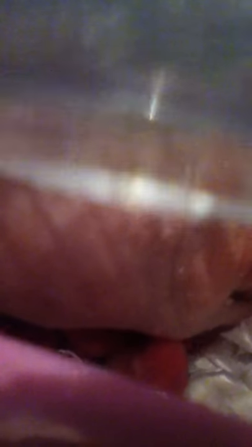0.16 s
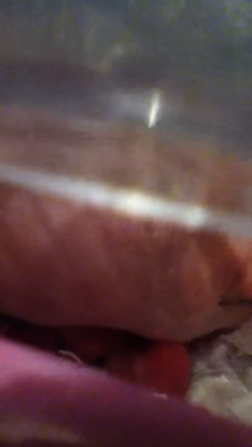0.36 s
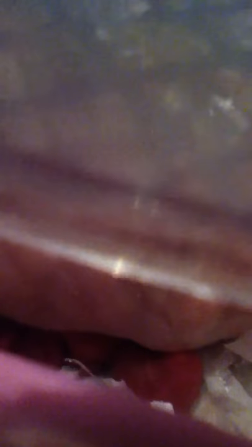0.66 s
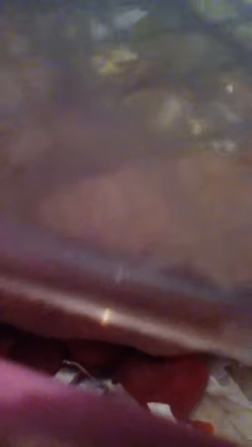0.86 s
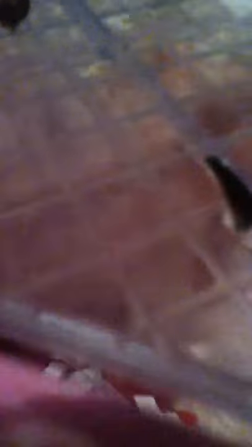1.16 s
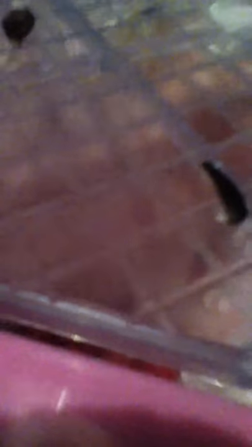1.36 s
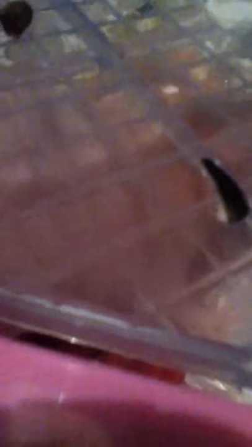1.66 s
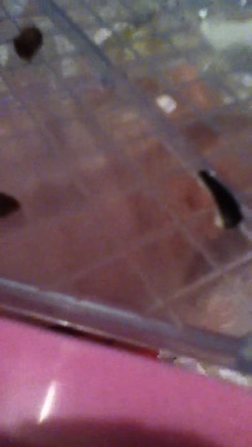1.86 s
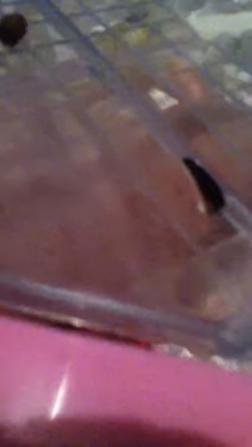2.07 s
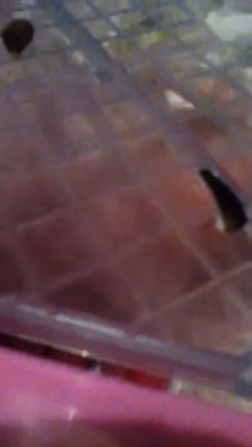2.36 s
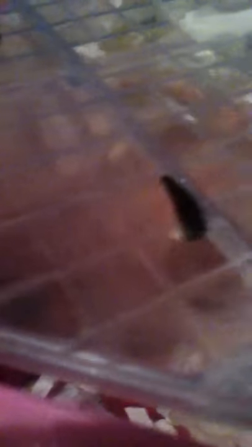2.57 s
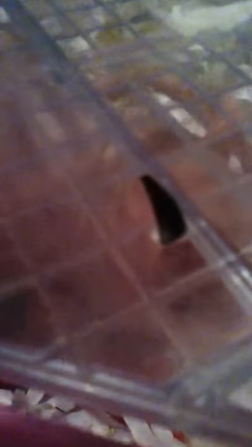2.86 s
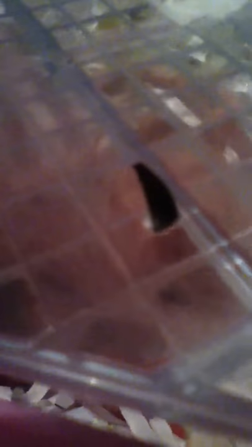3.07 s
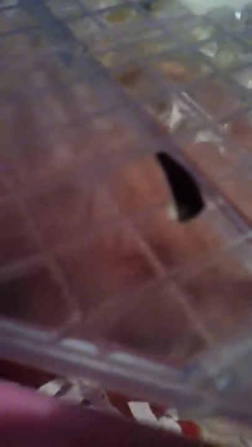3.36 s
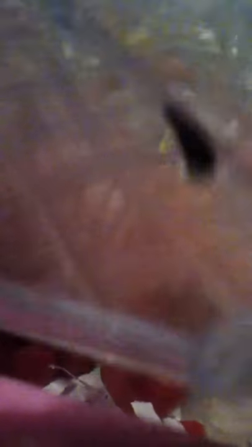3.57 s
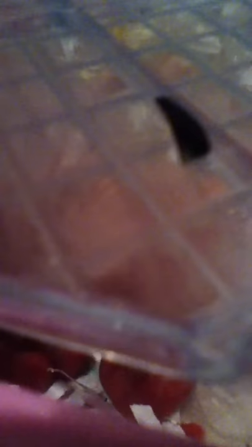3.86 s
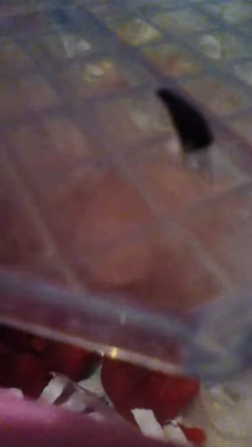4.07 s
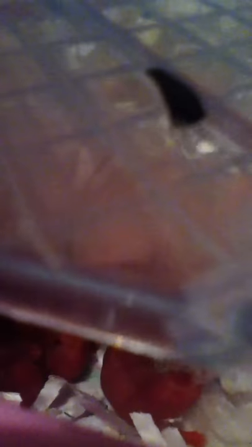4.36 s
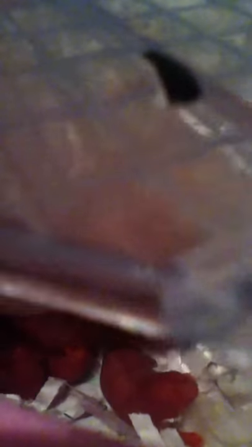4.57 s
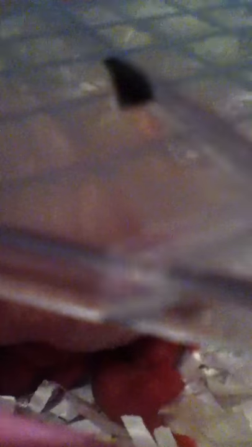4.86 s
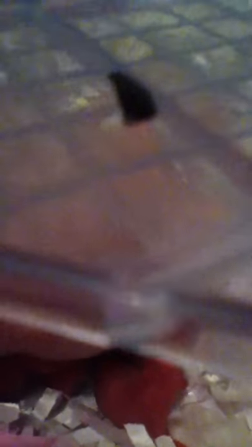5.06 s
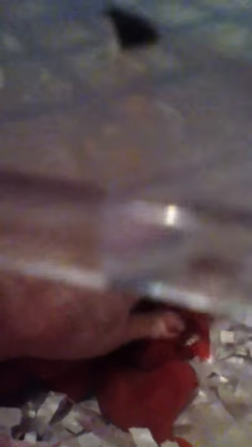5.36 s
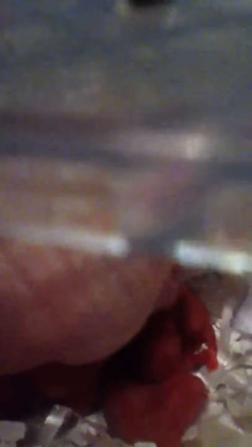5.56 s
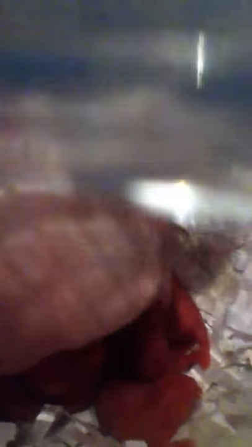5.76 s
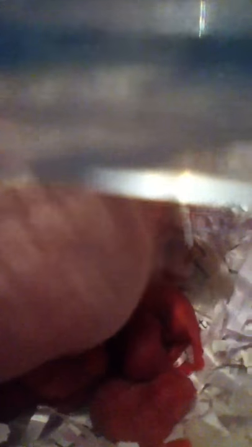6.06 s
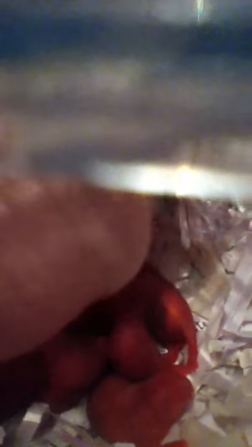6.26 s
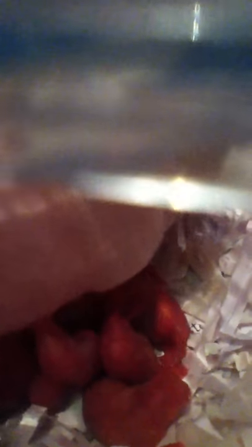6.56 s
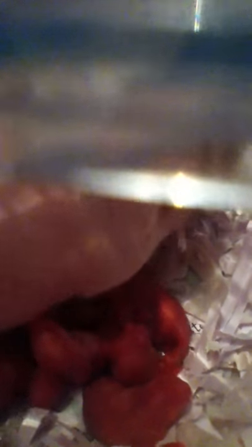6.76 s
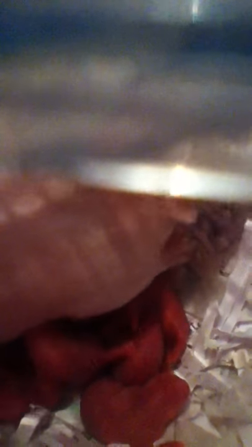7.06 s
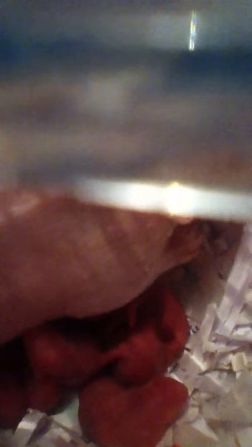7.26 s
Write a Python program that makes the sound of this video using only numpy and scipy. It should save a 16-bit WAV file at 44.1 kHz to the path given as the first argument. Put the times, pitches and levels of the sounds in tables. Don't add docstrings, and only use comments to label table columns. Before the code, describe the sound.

Close paper snaps and soft bumps, a loud early plastic knock, then sparse rustling with brief hoarse pup squeaks, the loudest near the end.

```python
import sys
import numpy as np
from scipy import signal
from scipy.io import wavfile

SR = 44100
rng = np.random.default_rng(int(sys.argv[2]) if len(sys.argv) > 2 else 0)


def waveform_to_disk(signal):
    frames = np.transpose(np.atleast_2d(signal))
    scaled = np.clip(frames, -1, 1) * 32767
    samples = np.round(scaled).astype(np.int16)
    wavfile.write(sys.argv[1], SR, samples)


def linear_from_db(decibels):
    return 10 ** (np.asarray(decibels, float) / 20)


N = 327222

# (time [s], rumble level [dB], far whoosh level [dB])
ROOM_LEVELS = [
    (0.0, -62.5, -78),
    (0.72, -59.5, -62),
    (1.07, -53, -64),
    (1.49, -59.5, -59),
    (3.37, -60, -58),
    (5.72, -57, -59.5),
    (6.49, -58, -57.5),
    (6.72, -62.5, -61),
    (7.42, -61.5, -67),
]
# (frequency [Hz], density [dB per Hz])
RUMBLE_SPECTRUM = [(15, -44), (25, -15.5), (146, 1), (176, 0), (213, 2.5), (444, -8.5), (605, -11),
                   (1220, -16), (1500, -32), (1950, -45), (3300, -120)]
# (frequency [Hz], density [dB per Hz])
WHOOSH_SPECTRUM = [(500, 0), (900, 1.5), (1400, 14.5), (1800, -29), (2600, -31), (4000, -20)]
# (frequency [Hz], density [dB per Hz])
HISS_SPECTRUM = [(180, -13), (300, -14.5), (546, -12.5), (1210, -14.5), (2030, -11.5), (13800, -18.5),
                 (14500, -21), (16000, -28)]
# (frequency [Hz], level [dB])
WHINE_TONE = [(14993, -80)]
# (middle time [s], spread [s], level [dB], brightness [dB])
RUSTLE_SWELLS = [(0.019, 0.029, -62, 9.5), (.11, 0.072, -71, 12), (.26, 0.15, -64, -10),
                 (.65, 0.025, -63, -9), (.91, 0.089, -54.5, -8), (1.04, 0.035, -51, -12),
                 (1.25, 0.14, -64, -20), (1.4, 0.034, -66, -15), (1.475, 0.024, -54, -9),
                 (1.93, 0.022, -57.5, -26), (3.105, 0.032, -57.5, -25), (3.36, 0.072, -62.5, -17),
                 (3.76, 0.1, -61, -16), (3.74, 0.018, -64, -25), (4.3, 0.12, -66, -15),
                 (4.56, 0.032, -58, -10), (4.69, 0.045, -61.5, -6), (5.09, 0.031, -58, -20),
                 (5.6, 0.15, -71.5, -10), (5.8, 0.14, -62.5, -5), (5.93, 0.028, -65, -15),
                 (6.15, 0.12, -74, -4), (6.42, 0.075, -64, -1), (6.64, 0.038, -55.5, -22),
                 (7.15, 0.062, -62.5, -7)]
# (time [s], peak level [dB], pitch [Hz])
STIFF_SNAPS = [(.0454, -53, 6640), (.0722, -50, 6050), (.1037, -48, 6800), (.1481, -40.5, 2270),
               (.1614, -44.5, 1800), (.3795, -47, 2310), (.4923, -47, 4540), (3.212, -45, 2000),
               (4.3345, -49, 4060), (4.18, -49, 3500), (4.314, -51, 3500), (5.07, -51, 4000),
               (.1912, -43.5, 2200), (6.437, -48, 2000), (4.6997, -44, 2200), (4.796, -39, 5400),
               (5.4295, -41, 5200), (5.5897, -45, 2900), (5.7753, -49, 1940), (5.8222, -47, 4180),
               (5.932, -46, 5500), (6.1973, -46, 6700), (6.3285, -45, 1850), (6.3874, -37.5, 1600),
               (6.4074, -57, 1800), (6.4253, -35.5, 2880), (6.4457, -42, 2340), (6.4534, -44, 3560),
               (6.5724, -38.5, 4760)]
# (time [s], peak level [dB], pitch [Hz])
LIMP_SNAPS = [(.0104, -35.5, 5200), (.5232, -40, 4100), (.6519, -45, 4030), (.7123, -46.5, 3200),
              (.9373, -38.5, 1800), (.9577, -32, 3600), (1.066, -41, 5600), (1.1837, -37, 3240),
              (1.2574, -47, 4680), (3.1492, -46, 2900), (3.5344, -48.5, 2900), (3.7189, -45, 4770),
              (3.7574, -43, 4500), (3.775, -46, 4770), (3.8447, -49, 5130), (3.886, -47, 4700),
              (4.0776, -44.5, 5070), (4.138, -46.5, 2260), (4.5381, -51, 2910), (4.9377, -44.5, 4950),
              (4.9691, -44.5, 3460), (5.896, -43.5, 3620), (5.9209, -40, 4240), (5.987, -50, 3200),
              (6.1185, -46, 3700), (6.8174, -43, 3550), (6.8249, -39.5, 2380), (6.8508, -47, 5800),
              (7.1272, -43.5, 1800), (7.3886, -44, 2680)]
# (time [s], peak level [dB], pitch [Hz])
CLAW_TICKS = [
    (5.4191, -42, 2040),
    (6.9496, -52.5, 2130),
]
# (time [s], peak level [dB], pitch [Hz])
LIP_SMACKS = [
    (2.1105, -57, 5200),
    (2.1754, -57, 4800),
    (2.1954, -55, 5000),
    (2.2104, -47.5, 5000),
    (2.4823, -50, 5800),
]
# (time [s], peak level [dB], pitch [Hz], edge above 500 Hz [dB], T60 [s])
SOFT_BUMPS = [(0.191, -36, 450, -4.5, 0.11), (0.197, -37, 167.4, -8, 0.2), (0.607, -47.5, 165.4, -20, 0.26),
              (.889, -42, 216, -21, 0.19), (.934, -43, 170, -4, 0.25), (1.005, -39.5, 141, -8, 0.2),
              (1.364, -46.5, 194, -6.5, 0.26), (1.469, -52.5, 224, 1, .12), (1.892, -49.5, 396, 0, .1),
              (1.911, -42.5, 198, -12, 0.22), (1.9427, -39.5, 485, -7, 0.056), (1.705, -49, 230, -9, 0.11),
              (1.97, -48, 450, -8, .1), (2.216, -38.5, 203.7, -10, 0.24), (2.228, -30.5, 204.7, -19, 0.17),
              (2.245, -33, 183.4, -19, 0.19), (2.265, -39.5, 166, -17, 0.1),
              (2.4835, -45.5, 580, -7, 0.026), (4.235, -53, 1200, -3, .14), (5.197, -39.5, 390, -3, 0.025),
              (5.442, -37, 208, -7.5, 0.11), (5.467, -52, 300, 2, 0.047), (5.897, -41, 387, -1.5, 0.033),
              (0.1914, -43, 1250, -5, 0.13)]
# (time [s], pitch [Hz], level [dB])
SQUEAK_CONTOURS = [
    [(.732, 1810, -58), (.74, 1750, -53), (.75, 1620, -61), (.756, 1510, -51), (.773, 1520, -52),
     (.779, 1550, -60), (.8, 1650, -58)],
    [(.72, 2500, -64), (.728, 2480, -61), (.748, 2400, -59)],
    [(1.955, 4450, -78), (1.963, 4480, -70)],
    [(1.978, 4480, -75), (2.0, 4400, -84)],
    [(2.112, 4430, -63), (2.13, 4490, -60), (2.15, 4430, -60), (2.175, 4270, -60.5)],
    [(2.285, 1010, -72), (2.315, 1566, -63), (2.35, 1950, -63), (2.366, 2070, -78), (2.382, 2205, -65),
     (2.4, 2820, -58), (2.411, 3130, -59), (2.436, 3540, -58.5), (2.448, 3600, -68)],
    [(2.403, 1610, -70), (2.413, 1605, -58.5), (2.422, 1570, -73)],
    [(3.17, 1416, -56), (3.18, 1480, -63)],
    [(3.168, 2790, -62), (3.178, 2920, -53), (3.188, 3150, -54), (3.196, 3100, -54), (3.208, 2820, -56),
     (3.227, 2600, -69)],
    [(6.512, 2505, -53), (6.518, 2480, -48), (6.53, 2480, -44), (6.54, 2640, -43), (6.547, 2756, -45),
     (6.554, 2716, -42), (6.56, 2760, -42), (6.566, 2720, -42), (6.571, 2600, -58)],
]
# (overtones against tone [dB], roughness [0-1])
CALL_VOICING = [(-20, .45), (-16, 0.35), (-40, .15), (-40, .1), (-40, 0.04), (-0.5, .22), (3, 0.32),
                (1, 0.2), (-11, .13), (-12.5, 0.1)]
# (frequency [Hz], gain [dB])
THROAT_RESPONSE = [(1000, 2.5), (3000, 0), (3800, 4.5), (4700, 13.5), (5600, 0.5), (6800, -6), (8000, 2),
                   (12000, -10)]
# (start [s], length [s], level [dB], throat from
# [Hz], throat to [Hz])
BREATH_SWELLS = [
    (0.728, 0.066, -54.5, 3600, 3350),
    (2.213, 0.16, -53.5, 4410, 4600),
    (2.221, .07, -60, 5300, 5520),
    (2.271, .14, -53.5, 5030, 6030),
    (2.326, 0.095, -53, 4000, 4800),
    (4.226, 0.054, -60, 1854, 1870),
    (2.273, 0.09, -63, 11200, 11000),
]
# (start [s], length [s], level [dB], throat from [Hz], throat to [Hz])
BREATH_BURSTS = [
    (3.168, 0.012, -59, 4150, 4300),
    (6.498, .022, -50, 3200, 2800),
    (6.549, 0.021, -55.5, 5900, 5400),
    (6.5465, .006, -52, 3500, 3000),
]
# (time [s], level [dB])
SHOVE_LEVELS = [
    (.957, -42),
    (.965, -46),
    (.969, -35),
    (.976, -34.5),
    (.995, -43.5),
    (1.02, -56),
    (1.05, -56),
]
# (frequency [Hz], bandwidth [Hz], level [dB])
WAD_HOLLOWS = [(1800, 710, 5), (3330, 1200, 2), (5200, 350, -1.5), (8000, 730, -2)]
# (time [s], peak level [dB])
KNOCK_STEPS = [
    (1.0770, -20),
    (1.0793, -13.5),
    (1.0811, -11),
    (1.0830, -22),
    (1.0845, -4),
    (1.0952, -18),
    (1.1037, -11.5),
    (1.118, -16),
]
# (frequency [Hz], level [dB], T60 [s])
SHELL_MODES = [(117, -17.5, 0.32), (156.3, -2.5, 0.45), (198.4, 0.5, 0.25), (228.4, -3, 0.31),
               (261, -1.5, 0.12), (333, -6.5, 0.27), (393, -9, 0.19), (506, -1.5, 0.11), (531, -5.5, .09),
               (707, -13, 0.15), (893, 1, 0.13), (1400, -16, 0.1), (1232, -4, 0.11)]
# (frequency [Hz], density [dB per Hz])
RATTLE_SPECTRUM = [(290, -25), (500, -0.5), (795, -7), (893, -2), (1230, -5.5), (1340, -4), (2430, -13),
                   (8580, -28), (16000, -50)]
# (frequency [Hz], T60 [s])
RATTLE_T60 = [(400, 0.15), (2000, 0.14), (5000, 0.22), (14000, 0.074)]
# (frequency [Hz], density [dB per Hz])
CHATTER_SPECTRUM = [(700, -13), (1500, -9), (3500, 4), (6000, -14.5), (9000, -14), (14000, -38)]
# (start [s], length [s], level [dB], slap rate [per s], throat [Hz])
CALL_CREAKS = [
    (3.15, 0.036, -52, 560, 3320),
    (6.48, 0.0324, -43, 980, 3500),
]
# (start [s], end [s], frequency [Hz], bandwidth [Hz], level [dB])
FAR_DRONES = [
    (5.88, 6.68, 1450, 260, -63),
    (4.2, 4.35, 1180, 290, -67),
    (5.9, 6.68, 606, 86, -70.5),
]


def rms_one(x):
    return x / np.sqrt(np.mean(x ** 2) + 1e-20)


def columns(rows, first=0, size=N):
    s, *rest = np.transpose(rows)
    times = (first + np.arange(size)) / SR
    return [np.interp(times, s, c) for c in rest]


def span(rows):
    first, size = round(rows[0][0] * SR), round((rows[-1][0] - rows[0][0]) * SR)
    k = np.arange(size)
    return first, size, np.clip(np.minimum(k, size - k) / (0.00099 * SR), 0, 1)


def at_hz(points, hz):
    table = np.array(points)
    return np.interp(np.log(hz), np.log(table[:, 0]), table[:, 1])


def add(out, s, piece):
    at = round(s * SR)
    out[at:at + len(piece)] += piece[:N - at]


def drift(rate, size=N):
    knots = rng.standard_normal(size // 100 + 300)
    return np.interp(np.arange(size) * rate / SR, np.arange(len(knots)), knots)


def flicker(depth_db, rate):
    knots = linear_from_db(depth_db * rng.standard_normal(400))
    return np.interp(np.arange(N) * (rate / SR), np.arange(400), knots)


def band(x, low_hz, high_hz):
    edges = np.clip([low_hz, high_hz], 15, .45 * SR)
    return signal.sosfilt(signal.butter(2, edges, "band", fs=SR, output="sos"), x)


def ring(x, hz, t60):
    r, w = linear_from_db(-60 / (t60 * SR)), 2 * np.pi * hz / SR
    return signal.lfilter([0, np.sin(w)], [1, -2 * r * np.cos(w), r * r], x + 1e-18)


def coloured(spectrum, shape, size=N):
    edges = 20 * 2 ** np.arange(0, 10, .5)
    white = rng.standard_normal((2, size))
    out = np.zeros(size)
    for k, mid in enumerate(np.sqrt(edges[:-1] * edges[1:])):
        if spectrum[0][0] < mid < spectrum[-1][0]:
            noise = band(white[k % 2], edges[k], edges[k + 1])
            out += linear_from_db(at_hz(spectrum, mid)) * shape(mid) * noise
    return out


def background():
    rumble_db, whoosh_db = columns(ROOM_LEVELS)
    rumble = rms_one(flicker(1.3, 9.0) * coloured(RUMBLE_SPECTRUM, lambda hz: flicker(1.9, 14.0)))
    whoosh = rms_one(coloured(WHOOSH_SPECTRUM, lambda hz: flicker(2.5, 12.0)))
    hiss = rms_one(coloured(HISS_SPECTRUM, lambda hz: 1))
    hz, whine_db = WHINE_TONE[0]
    whine = np.sqrt(2) * np.sin(2 * np.pi * hz * np.arange(N) / SR + 1.46 * drift(30.0))
    room = linear_from_db(rumble_db + 0.5) * rumble + linear_from_db(whoosh_db - 8.0) * whoosh
    return room + linear_from_db(-63.5) * hiss + linear_from_db(whine_db) * whine


def rustle(per_s=3000.0, spread_db=3.0):
    stir_db = -75.5
    born = rng.random(N) < per_s / SR * flicker(3.5, 40.0)
    strength = linear_from_db(spread_db * np.minimum(rng.exponential(1, N), 4))
    cracks = born * strength * np.sign(rng.random(N) - .5)
    pitches, dealt = np.geomspace(1100, 11500, 11), rng.integers(0, 11, N)
    rings = [ring(cracks * (dealt == k), hz, 3.0 / hz) for k, hz in enumerate(pitches)]
    dull, bright = rms_one(sum(rings[:8])), rms_one(sum(rings[8:]))
    out = linear_from_db(stir_db) * (dull + bright)
    for middle, spread, level_db, bright_db in RUSTLE_SWELLS:
        k = slice(max(round((middle - 3 * spread) * SR), 0), round((middle + 3 * spread) * SR))
        swell = np.exp(-((np.arange(N)[k] / SR - middle) / spread) ** 2)
        out[k] += linear_from_db(level_db - 3.0) * swell * (dull[k] + linear_from_db(bright_db) * bright[k])
    return out


def snaps():
    out, t = np.zeros(N), np.arange(1100) / SR
    kinds = ((STIFF_SNAPS, -8), (LIMP_SNAPS, -25), (CLAW_TICKS, 5), (LIP_SMACKS, -25))
    fade = np.exp(-t / 0.0011) + linear_from_db(-16 - 60 * t / 0.05)
    for rows, top_db in kinds:
        for s, peak_db, hz in rows:
            noise = rng.standard_normal((2, len(t)))
            noise[:, 0] = 2.6
            body = band(noise[0] * fade, hz / 2.35, hz * 1.79)
            favoured = rms_one(band(body, hz / 1.14, hz * 1.17)) / 12
            body = body / abs(body).max() + linear_from_db(-5.5) * favoured
            top = band(noise[1] * fade, 6000, 15000)
            crack = body / abs(body).max() + linear_from_db(top_db) * top / abs(top).max()
            add(out, s + .0006, linear_from_db(peak_db + 1.3) * crack)
    return out


def bumps():
    out, t = np.zeros(N), np.arange(8000) / SR
    for s, peak_db, hz, edge_db, t60 in SOFT_BUMPS:
        push = rng.standard_normal(len(t)) * np.exp(-t / 0.003)
        push[0] = 3.2
        soft = band(push, 95, 540)
        low = np.zeros(len(t))
        for ratio in (.6, .78, 1, 1.3, 1.7, 2.2):
            weakening = max(ratio ** (0.6 - edge_db / 4.3), ratio ** -1.5)
            low += ring(soft, hz * ratio, max(t60, .02) / ratio ** 0.17) / weakening
        edge = band(push * np.exp(-t / 0.075), 590, 1380)
        add(out, s, linear_from_db(peak_db + 1.5) * (low / abs(low).max() + linear_from_db(edge_db) * edge / abs(edge).max()))
    return out


def squeaks():
    overtone_step_db = -7.5
    effort = .7
    out = np.zeros(N)
    for rows, (overtones_db, rough) in zip(SQUEAK_CONTOURS, CALL_VOICING):
        first, size, fade = span(rows)
        hz, level_db = columns(rows, first, size)
        phase = 2 * np.pi * np.cumsum(hz * (1 + 0.172 * rough * drift(888.0, size))) / SR
        weakening_db = effort * (level_db - level_db.max())
        partials_db = np.r_[0, overtones_db + overtone_step_db * np.arange(4)]
        tone = np.zeros(size)
        for k, partial_db in enumerate(partials_db):
            gain_db = partial_db + at_hz(THROAT_RESPONSE, (k + 1) * hz) + (k > 0) * weakening_db
            tone += linear_from_db(gain_db) * np.sin((k + 1) * phase)
        strength = linear_from_db(level_db + 6.7 * rough * drift(412.0, size))
        add(out, first / SR, np.sqrt(2) * fade * tone * strength)
    return out


def hoarse_shapes():
    peak, rise_db, fall_db, burst_fall_db = 0.42, 10, 9, -2
    shapes = []
    for s, length, db, low, high in BREATH_SWELLS:
        top = (s + peak * length, db, low + peak * (high - low))
        shapes.append([(s, db - rise_db, low), top, (s + length, db - fall_db, high)])
    for s, length, db, low, high in BREATH_BURSTS:
        shapes.append([(s, db, low), (s + length, db - burst_fall_db, high)])
    return shapes


def rasps(pulses_per_s=650.0, breath=.5):
    throat_width = 0.17
    out = np.zeros(N)
    for rows in hoarse_shapes():
        first, size, fade = span(rows)
        level_db, hz = columns(rows, first, size)
        turns = np.cumsum(pulses_per_s * linear_from_db(3.4 * drift(350.0, size))) / SR
        puffs = breath + 2.1 * np.exp(-(turns % 1) / .25)
        noise = rng.standard_normal((5, size)) * puffs * linear_from_db(2.2 * drift(90.0, size))
        narrow = signal.sosfilt(signal.butter(2, 230, fs=SR, output="sos"), noise[:2])
        wide = signal.sosfilt(signal.butter(2, 900, fs=SR, output="sos"), noise[2:4])
        share = np.clip((throat_width * hz - 400) / 1300, 0, 1)
        slow = np.sqrt(1 - share) * rms_one(narrow) + np.sqrt(share) * rms_one(wide)
        phase = 2 * np.pi * np.cumsum(hz) / SR
        throat = slow[0] * np.cos(phase) + slow[1] * np.sin(phase)
        top = band(noise[4], 2000, 9300)
        add(out, first / SR, fade * linear_from_db(level_db) * (throat + linear_from_db(-10.5) * rms_one(top)))
    return out


def shove():
    out = np.zeros(N)
    first, size, fade = span(SHOVE_LEVELS)
    level_db, = columns(SHOVE_LEVELS, first, size)
    cracks = rng.standard_normal(size) * linear_from_db(2.8 * drift(494.0, size))
    hollows = sum(linear_from_db(db) * band(cracks, hz - width / 2, hz + width / 2) for hz, width, db in WAD_HOLLOWS)
    broad = band(cracks, 540, 7200)
    add(out, first / SR, fade * linear_from_db(level_db) * rms_one(rms_one(hollows) + rms_one(broad)))
    return out


def knock():
    out, size = np.zeros(N), 20000
    start, t = KNOCK_STEPS[0][0], np.arange(size) / SR
    clicks = np.zeros(size)
    for s, peak_db in KNOCK_STEPS:
        clicks[round((s - start) * SR)] = -linear_from_db(peak_db)
    shell = np.zeros(size)
    for hz, level_db, t60 in SHELL_MODES:
        struck = clicks * linear_from_db(rng.normal(0, 1.8, size))
        shell += linear_from_db(level_db - 23.5) * ring(struck, hz, t60)
    slap = linear_from_db(-0.5) * ring(clicks, 378, 0.0095)
    rise = 1 - np.exp(-t / 0.00052)
    shaking_db = 1.9 * drift(110.0, size)

    def decay(hz):
        return rise * linear_from_db(-60 * t / at_hz(RATTLE_T60, hz) + shaking_db + 1.1 * drift(85.0, size))

    rattle = coloured(RATTLE_SPECTRUM, decay, size)
    add(out, start, shell + slap + linear_from_db(-32.5) * rms_one(rattle))
    return out


def chatter():
    hold_s, hold_db = 0.091, -16
    out, size = np.zeros(N), 6000
    t = np.arange(size) / SR
    grains = linear_from_db(3.1 * drift(400.0, size) - 70 * t) / (1 + np.exp((t - hold_s) / 0.003))
    buzz = coloured(CHATTER_SPECTRUM, lambda hz: grains * linear_from_db(1.7 * drift(81.0, size)), size)
    add(out, KNOCK_STEPS[1][0], linear_from_db(-29.0 + hold_db) * rms_one(buzz))
    return out


def creaks():
    jitter, t60, upper_ratio, fall_db = .2, 0.0032, 1.38, 6.5
    out = np.zeros(N)
    for s, length, level_db, per_s, hz in CALL_CREAKS:
        first, size, fade = span([(s,), (s + length,)])
        turns = np.cumsum(per_s * (1 + jitter * drift(700.0, size))) / SR
        slaps = np.diff(np.floor(turns), prepend=-1) * linear_from_db(2.0 * rng.standard_normal(size))
        rung = ring(slaps, hz, t60) + linear_from_db(-4.5) * ring(slaps, hz * upper_ratio, t60)
        rung = rung + linear_from_db(-3.0) * band(slaps, 1100, 7700)
        level = linear_from_db(level_db - fall_db * np.arange(size) / size)
        add(out, s, level * np.sqrt(fade) * rms_one(rung))
    return out


def drones():
    out = np.zeros(N)
    for start, end, hz, width, level_db in FAR_DRONES:
        size = round((end - start) * SR)
        noise = band(rng.standard_normal(size), hz - width / 2, hz + width / 2)
        level = linear_from_db(level_db + 1.2 * drift(60.0, size))
        add(out, start, level * signal.windows.tukey(size, .25) * rms_one(noise))
    return out


def scene():
    near = rustle() + snaps() + rasps() + shove() + chatter() + creaks()
    walls = np.zeros(N)
    for lag_s, echo_db in ((.0023, -22.5), (.0047, -13.5), (.011, -14.5)):
        add(walls, lag_s, linear_from_db(echo_db) * near)
    thuds = signal.sosfilt(signal.butter(2, 95, "high", fs=SR, output="sos"), bumps())
    thuds = thuds + signal.sosfilt(signal.butter(4, 105, "high", fs=SR, output="sos"), knock())
    return (near + walls + squeaks() + thuds + drones() + background())[None]


def low_pass(x):
    return signal.sosfilt(signal.butter(12, 16490, fs=SR, output="sos"), x)


def record(dry):
    cut = signal.sosfilt(signal.cheby2(14, 60, 16200, fs=SR, output="sos"), dry)
    return low_pass(cut)


dry = scene()
out = record(dry)
waveform_to_disk(out)
```